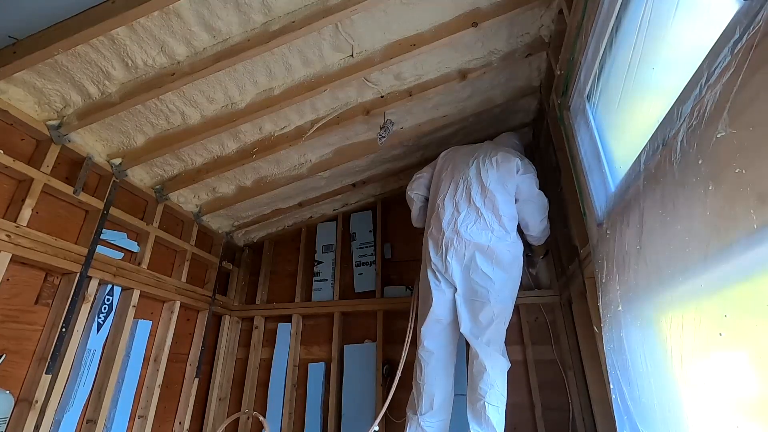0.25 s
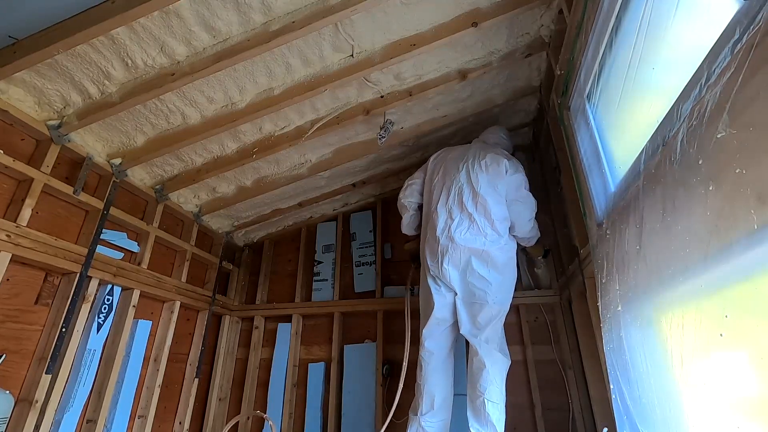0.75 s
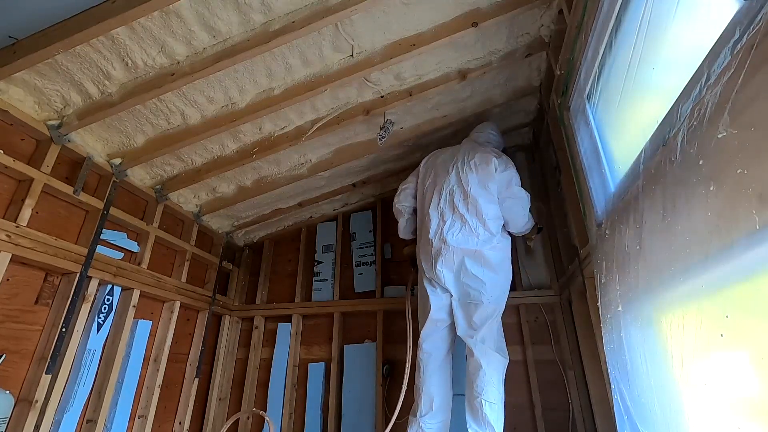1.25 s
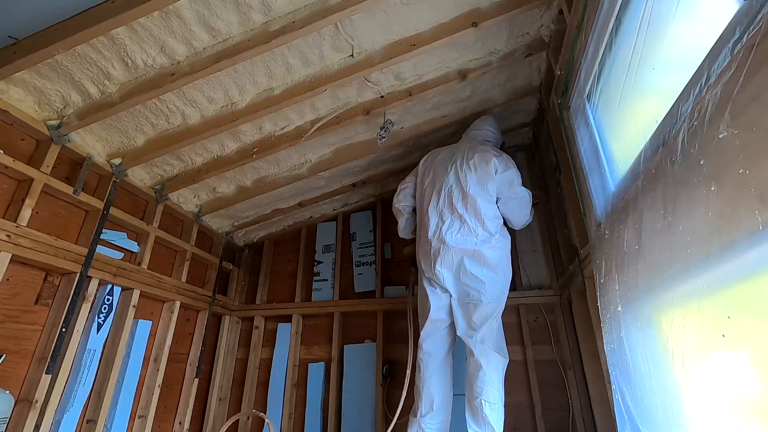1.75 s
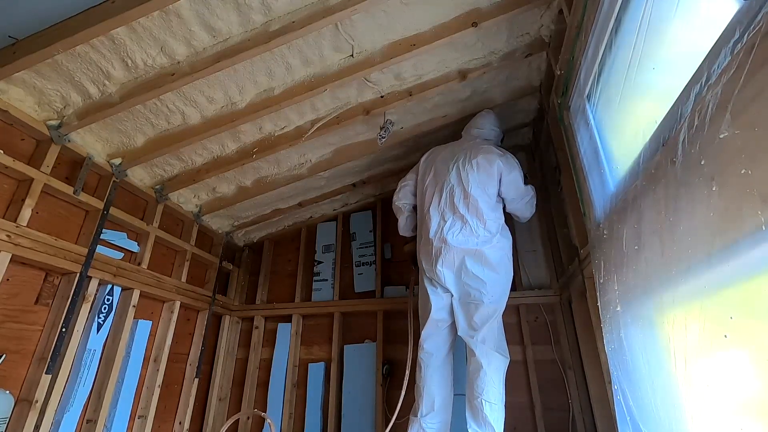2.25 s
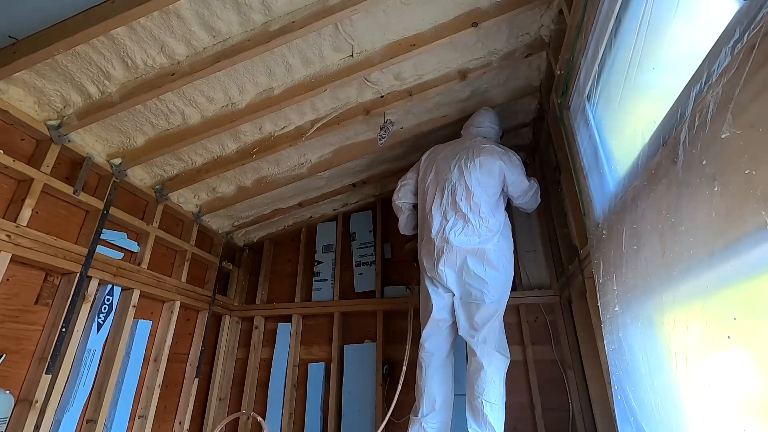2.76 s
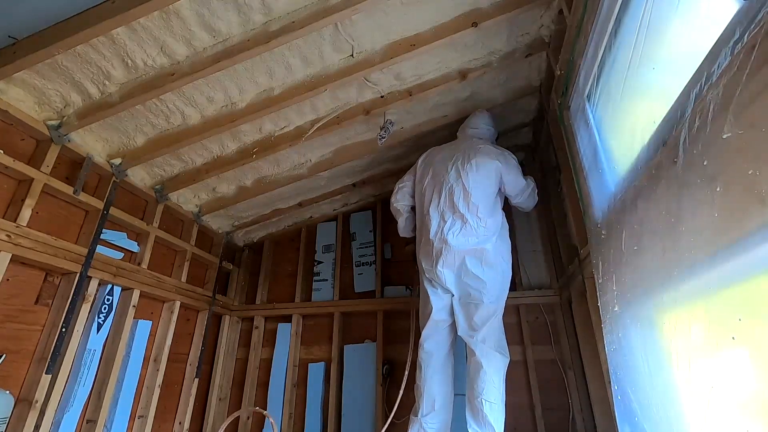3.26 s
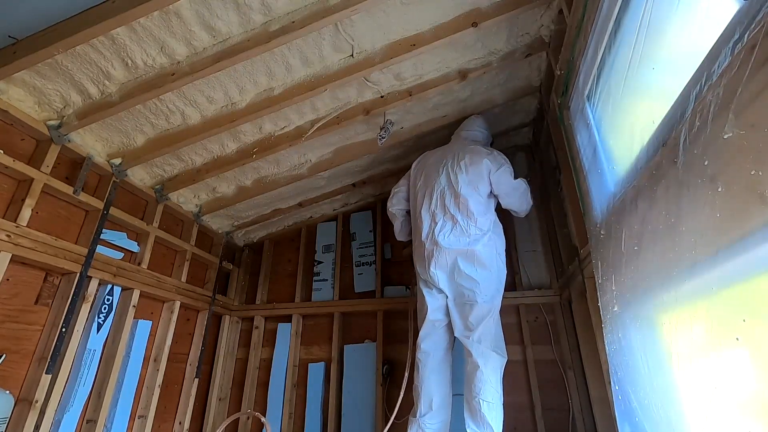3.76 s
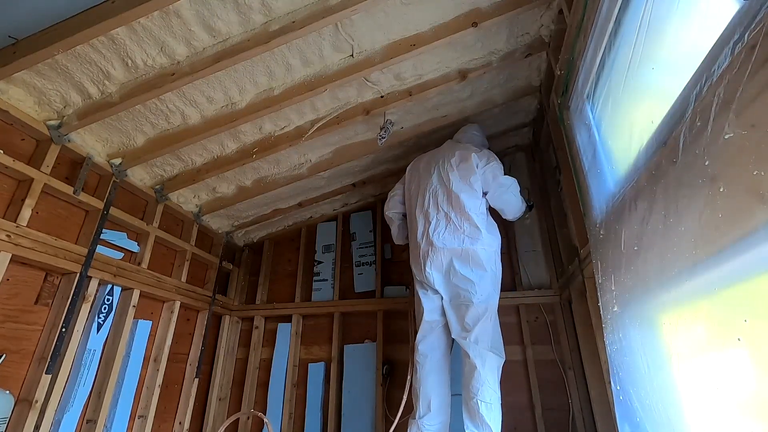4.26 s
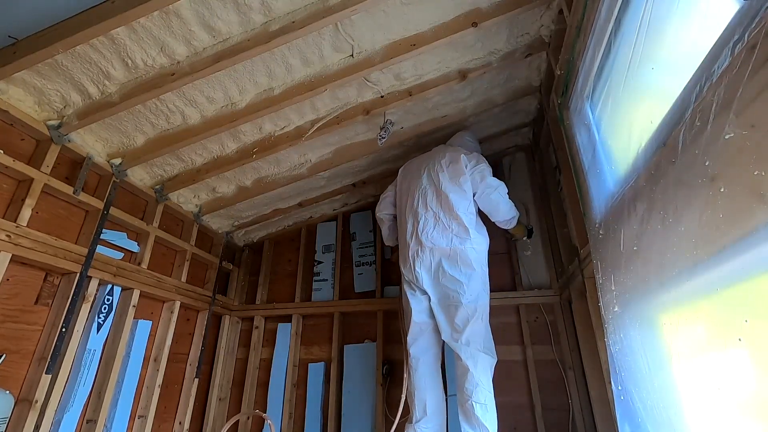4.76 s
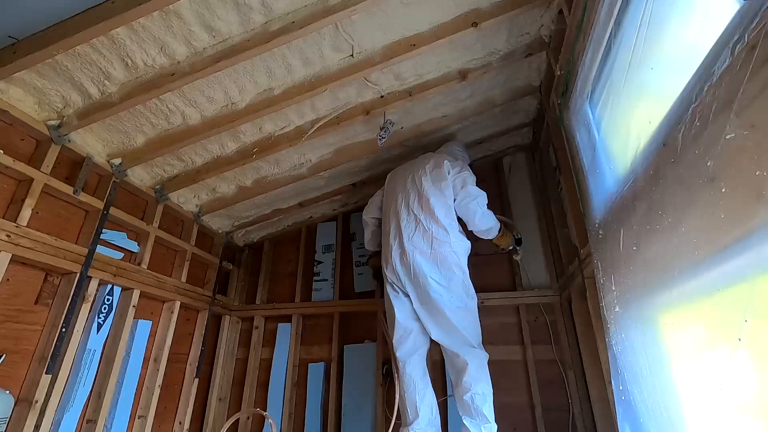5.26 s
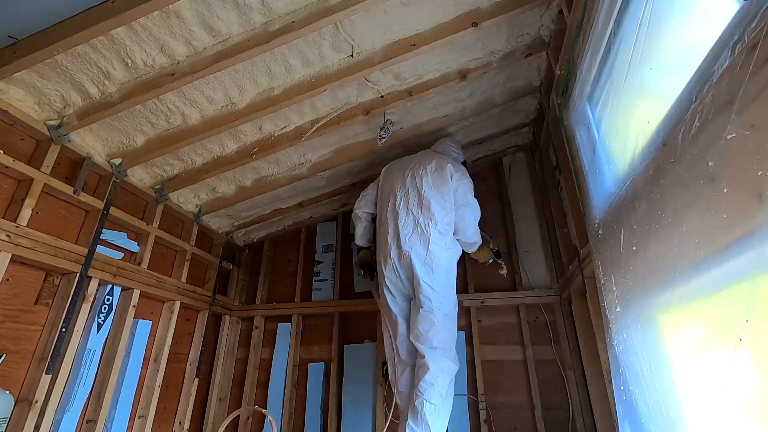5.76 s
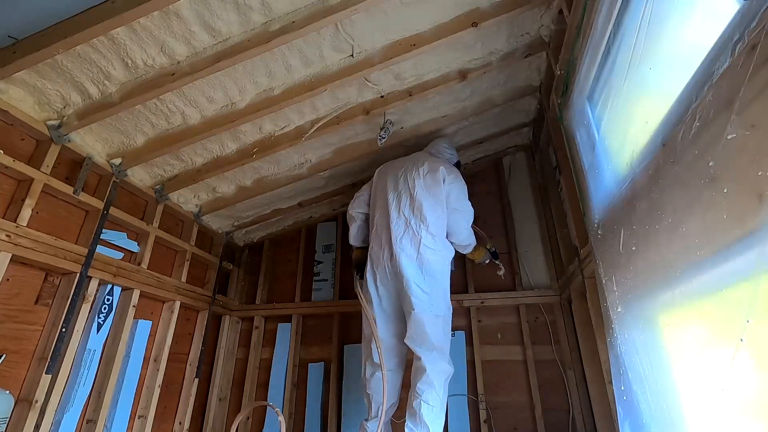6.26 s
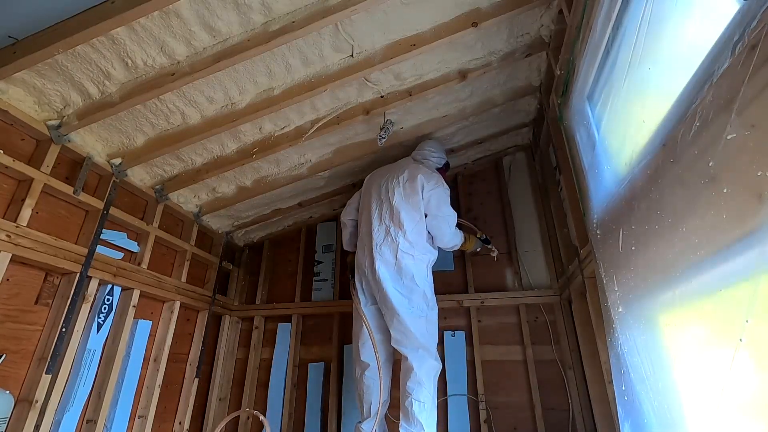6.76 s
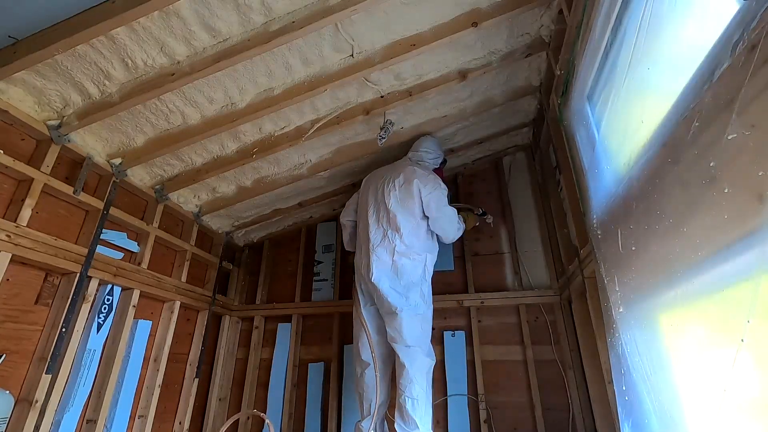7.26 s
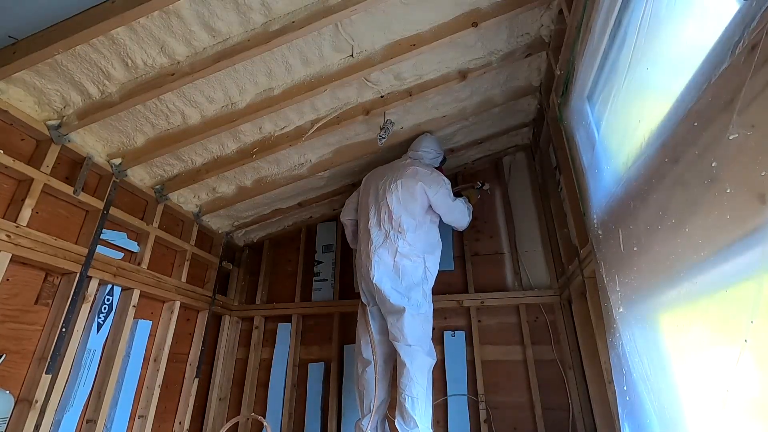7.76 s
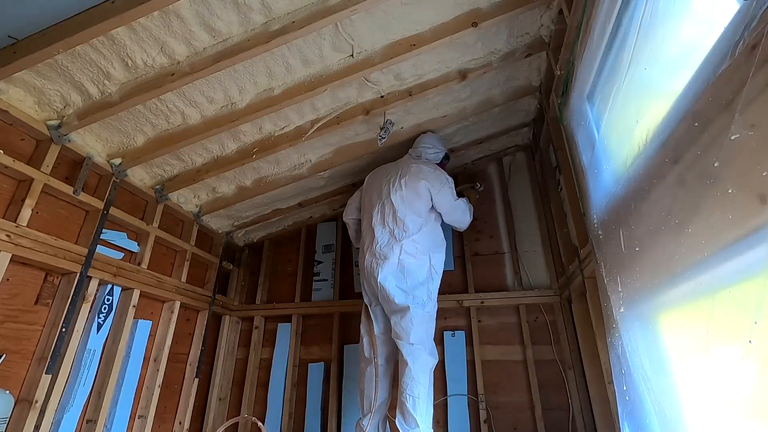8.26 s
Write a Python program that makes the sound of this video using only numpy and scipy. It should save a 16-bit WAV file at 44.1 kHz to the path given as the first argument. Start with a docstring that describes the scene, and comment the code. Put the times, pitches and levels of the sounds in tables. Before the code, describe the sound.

Rushing hiss of insulation foam being sprayed stops and restarts, broken by brief wooden knocks, rustling and a low rumble.

```python
"""A bare timber attic, a small camera a few metres from a foam gun; faint machinery and air from outside.
The gun's turbulent jet is already hissing into a wall bay, heard through one muffled microphone port.
From the second burst the camera fades over to its stereo pair; a few light knocks lead into the third.
In the long pause the worker shifts his feet: boards knock, the suit rustles, the camera's perch shakes.
The fourth burst follows, its hiss changing colour like the others as the nozzle passes studs and hollows."""
import sys
import numpy as np
from scipy import signal
from scipy.fft import rfft, irfft, next_fast_len
from scipy.io import wavfile
from scipy.ndimage import uniform_filter1d

SR = 44100
rng = np.random.default_rng(int(sys.argv[2]) if len(sys.argv) > 2 else 0)


def wrap_up_sound(samples):
    """Save the sound to the file named by the first command line argument, as 16-bit audio."""
    columns = np.atleast_2d(samples).T
    # keep every value between -1 and 1, then stretch to whole-number steps
    tamed = np.clip(columns, -1, 1)
    steps = np.round(tamed * 32767).astype(np.int16)
    wavfile.write(sys.argv[1], SR, steps)


N = 375732
TIME = np.arange(N) / SR
FFT_SIZE = next_fast_len(N + SR, real=True)
HZ = np.maximum(np.fft.rfftfreq(FFT_SIZE, 1 / SR), 1)


def undb(db):
    return 10 ** (np.asarray(db) / 20)


def unit(x):
    return x / np.sqrt(np.mean(x ** 2))


def over_hz(table, column=1):
    """A table column on the frequency axis, straight on log frequency."""
    table = np.array(table, float)
    return np.interp(np.log(HZ), np.log(table[:, 0]), table[:, column])


def over_time(table):
    """Columns of a curve on the time axis."""
    times, *columns = np.transpose(table)
    return [np.interp(TIME, times, column) for column in columns]


def spell(table):
    """Gains of a curve's dB columns, silent outside it."""
    return undb(over_time(table)) * ((TIME > table[0][0]) & (TIME < table[-1][0]))


def shape(x, gain):
    """Filter by a gain given on the frequency axis."""
    return irfft(rfft(x, FFT_SIZE) * gain, FFT_SIZE)[..., :N]


def butter(x, order, hz, kind="lowpass"):
    return signal.sosfilt(signal.butter(order, hz, kind, fs=SR, output="sos"), x)


def walk(rate_hz):
    """Random levels held for 1 / rate_hz and slewed twice; unit RMS."""
    hold = int(SR / rate_hz)
    steps = np.repeat(rng.standard_normal(N // hold + 1), hold)
    return unit(uniform_filter1d(uniform_filter1d(steps, hold), hold)[:N])


def site():
    """Distant machinery and outdoor air: two unrelated noises that swell slowly together."""
    # background spectrum: f/Hz, density/dB
    spectrum = [(30, 4), (60, 0.5), (110, 4.5), (250, -3.5), (450, -15), (900, -18), (1400, -20),
                (1900, -27), (2500, -28), (5000, -31), (9000, -44), (15000, -72)]
    air = [unit(shape(rng.standard_normal(N), undb(over_hz(spectrum)))) for _ in range(2)]
    return np.array(air) * undb(-45 + 2.2 * walk(3.35))


def attic(x, room_db, places, t60_s=0.3, treble_t60_s=0.15):
    """Direct sound plus echoes, and a row of unrelated echoes; a moving source meets new ones by place."""
    t = np.arange(SR // 3) / SR
    position = TIME / TIME[-1] * (places - 1)
    out = np.zeros((2, N))
    for place in range(places):
        weight = np.sqrt(np.clip(1 - abs(position - place), 0, 1))
        a, b = np.flatnonzero(weight)[[0, -1]]
        noise = rng.standard_normal((2, len(t)))
        low = uniform_filter1d(noise, size=9, axis=1)
        tail = low * undb(-60 * t / t60_s) + (noise - low) * undb(-60 * t / treble_t60_s)
        tail *= (t > .003) / np.sqrt(np.sum(tail ** 2, axis=1, keepdims=True))
        echoes = signal.fftconvolve((x * weight)[None, a:b], tail, axes=1)[:, :N - a]
        out[:, a:a + echoes.shape[1]] += echoes
    out[0] = (x + undb(room_db) * out[0]) / np.sqrt(1 + undb(2 * room_db))
    return out


def shake():
    """Floor bounce reaches each port through the camera's body, ringing its own low resonances."""
    # the perch shaking under shifting feet: t/s, left level/dB, right level/dB
    bounce = [(5.33, -62, -54), (5.38, -38, -32), (5.44, -35, -21), (5.53, -38, -27.5), (5.57, -39, -36),
              (5.71, -46, -41), (5.742, -26, -30), (5.755, -18, -16), (5.785, -22, -19), (5.815, -24, -12),
              (5.84, -25, -19), (5.87, -25, -14), (5.915, -24, -12.5), (5.94, -26, -25), (5.965, -24, -15),
              (5.99, -26, -21), (6.02, -26, -11), (6.05, -26, -14.5), (6.09, -32, -27), (6.125, -33, -17),
              (6.15, -38, -28), (6.18, -43, -40), (6.25, -43, -22.5), (6.31, -32, -29), (6.39, -33, -19.5),
              (6.5, -43, -30), (6.55, -46, -37), (6.8, -60, -46)]
    # resonances at the left port, then the right: f/Hz, width/Hz, level/dB
    port_modes = [
        [(48.5, 16, -2), (98, 63, -10.5)],
        [(58, 19, 6.5), (119, 47, -17)],
    ]
    out = []
    for level, modes in zip(spell(bounce), port_modes):
        resonance = sum(undb(db) / (1 + ((HZ - hz) / (width / 2)) ** 2) for hz, width, db in modes)
        sway = unit(shape(rng.standard_normal(N), resonance))
        swell = np.sqrt(uniform_filter1d(uniform_filter1d(sway ** 2, size=700), size=700) + .02)
        # the low rumble is held nearly steady, so its swells follow the footfall curve
        out.append(level * unit(sway / swell ** 0.73))
    return np.array(out)


def rustle():
    """The paper-like suit creases in dense small crackles as the worker moves."""
    # two spells of movement, each a curve: t/s, level/dB
    movements = [
        [(3.1, -82), (3.17, -56), (3.28, -58), (3.33, -80)],
        [(5.3, -44), (5.37, -28.5), (5.42, -31.5), (5.5, -50.5), (5.68, -44), (5.76, -40.5), (5.91, -39.5),
         (5.96, -32), (6.04, -43), (6.14, -47.5), (6.2, -47), (6.3, -68)],
    ]
    # spectrum of the creasing suit: f/Hz, density/dB
    spectrum = [(300, 4.5), (1200, -6), (2500, -3.5), (4500, -8.5), (8000, -19), (14000, -38)]
    crackle = rng.standard_normal(N) * undb(0.97 * rng.exponential(size=N) + 2 * walk(40))
    level = sum(spell(movement)[0] for movement in movements)
    return level * unit(shape(crackle, undb(over_hz(spectrum))))


def knocks(main_ring_hz=1180, crossover_hz=420):
    """Each knock is a short rattle of contacts: a dry crack, and a board's modes struck at a new spot."""
    # boards and gear: t/s, ring peak/dB, thud re ring/dB, rattle decay/s, crack re ring/dB, main ring f/Hz
    hits = [(2.959, -51.5, 16.5, 0.0045, -12, 1180), (3.077, -35, 0, .002, -20, 1050),
            (3.123, -51, 12, 0.0075, -12, 1180), (3.275, -39, -6, .004, -14, 1100),
            (3.339, -40, 9, 0.002, -3, 1300), (3.431, -29, -20, .014, -16, 1100),
            (5.33, -32, -10, .004, -12, 1050), (5.342, -23, -20, .005, -10, 1100),
            (5.355, -7, -28, .004, -14, 1190), (5.364, -21, 3, .008, 6, 1300),
            (5.373, -12, -4, 0.002, -6, 1400), (5.39, -19, 3, 0.008, 0, 1250),
            (5.42, -23, -3, 0.01, -3, 1400), (5.745, -38, 17, 0.025, -11, 1200),
            (5.848, -22, -3, 0.011, -13, 1080), (5.931, -21, -3, 0.006, -14, 1000),
            (5.943, -16, -3, 0.008, -6, 1330), (5.976, -24, 3, .012, -6, 950),
            (6.073, -40, 3, 0.015, 6, 1300)]
    # modes of a floorboard: f/Hz, level/dB, t60/s
    board_modes = [(110, -6, .12), (180, 0, .11), (270, -6, .08), (360, -9, .06), (700, -15, .015),
                   (1000, -5, .02), (1180, 0, .028), (1330, -4, .02), (1510, -8, .02), (2030, -9, .015),
                   (2600, -11, .012)]
    out, t = np.zeros(N + SR), np.arange(SR // 3) / SR
    for start_s, peak_db, thud_db, rattle_s, crack_db, ring_hz in hits:
        rattle = rng.standard_normal(len(t)) * np.exp(-t / rattle_s)
        onset = np.sqrt(1 - np.exp(-t / .0012))
        push = butter(rattle * onset, 3, 8000)  # boots and hose meet the boards softly
        response = np.zeros((2, len(t)))
        for hz, db, t60_s in board_modes:
            is_thud = hz < 500  # only the higher modes shift with the struck spot
            mode_hz = hz * (1 if is_thud else ring_hz / main_ring_hz) * (1 + 0.015 * rng.standard_normal())
            response[int(is_thud)] += undb(db - 60 * t / t60_s) * np.sin(2 * np.pi * mode_hz * t)
        ring, thud = signal.fftconvolve(response, push[None], axes=1)[:, :len(t)]
        crack = butter(push, 2, (1500, 3600), "bandpass")
        parts = np.array([butter(ring, 2, crossover_hz, "highpass"), butter(thud, 2, crossover_hz), crack])
        gains = undb(peak_db + np.array([0, thud_db, crack_db])) / abs(parts).max(axis=1)
        start = int(start_s * SR)
        out[start:start + len(t)] += gains @ parts
    return out[:N]


def bay(x, echo_count=6, echo_db=-13):
    """Studs, sheathing and the worker's body send back close echoes whose delays slide with the nozzle."""
    short_waves = shape(x, 1 / (1 + (1200 / HZ) ** 4))  # narrow surfaces return only short waves
    out = x.copy()
    for delay_s in rng.uniform(0.001507, .007, echo_count):
        out += undb(echo_db) * np.interp(TIME - delay_s - 0.000599 * walk(3.5), TIME, short_waves)
    return out * np.std(x) / np.std(out)


def hollows(x, half_width_share=.033):
    """Gliding, wavering bands of the hiss swell or thin out as the nozzle passes studs and hollows."""
    # bands of the hiss: start t/s, end t/s, from f/Hz, to f/Hz, lift/dB
    bands = [(0.272, .5, 1880, 1140, 4), (.95, 1.5, 7000, 6940, 3), (.95, 2.3, 1900, 1860, 2),
             (1.45, 2.15, 5200, 3500, 6.5), (1.6, 2.9, 2300, 2500, -5), (1.6, 2.8, 1000, 1050, 3),
             (1.9, 2.7, 624, 620, 6), (2.0, 2.4, 4300, 4100, 4), (2.25, 2.6, 6000, 5500, 5),
             (2.3, 2.8, 3300, 3500, 3), (3.38, 3.955, 3940, 3640, 6), (3.85, 4.35, 5170, 3700, 6),
             (4.0, 4.5, 1850, 1870, 4), (4.3, 4.7, 4370, 4180, 4.5), (4.3, 4.9, 1370, 1350, 2),
             (4.65, 5.2, 3980, 3500, 4), (4.8, 5.25, 7200, 7150, 3.5), (6.25, 6.85, 5000, 5300, 5.5),
             (6.4, 6.6, 8750, 8750, 4), (6.5, 8.1, 1300, 1370, 5), (6.6, 6.85, 4450, 4500, 4.5),
             (6.72, 7.1, 2900, 3350, 6.5), (6.8, 7.25, 3820, 4600, 5.5), (6.9, 8.1, 2150, 2000, -4),
             (7.1, 7.3, 7850, 7900, 3.5), (7.2, 7.7, 3360, 3190, 5), (7.25, 8.0, 2850, 2570, 4.5),
             (7.5, 7.8, 5730, 5800, 4.5), (7.8, 8.3, 3460, 3200, 2.5), (8.0, 8.25, 5700, 6300, 3),
             (8.12, 8.36, 5080, 5050, 8)]
    wander = 1 + .009 * walk(9)  # the hand is never still
    flicker = undb(1.5 * walk(12))
    out = x.copy()
    for start_s, end_s, from_hz, to_hz, lift_db in bands:
        a, b = int(start_s * SR), min(int(end_s * SR), N)
        centre_hz = np.linspace(from_hz, to_hz, b - a) * wander[a:b]
        carrier = np.exp(2j * np.pi * np.cumsum(centre_hz) / SR)
        narrow = signal.butter(1, half_width_share * from_hz, fs=SR, output="sos")
        band = 2 * (signal.sosfiltfilt(narrow, x[:, a:b] / carrier) * carrier).real
        envelope = np.sqrt(np.hanning(b - a)) * np.roll(flicker, int(from_hz) * 10)[a:b]
        out[:, a:b] += band * (undb(lift_db) - 1) * envelope
    return out


def foam_gun(open_db_per_s=158, puff_rise_db_per_s=280, puff_sag_db_per_s=90, knee_s=0.072):
    """Each trigger pull gives a purge puff, then a turbulent jet that hisses and roars on the wall."""
    # trigger pulls: puff t/s, full flow t/s, let-go t/s, fall/(dB/s), puff level/dB, puff treble/dB
    bursts = [(-.3, -.1, 0.44, 278, -70, -6), (0.833, 0.99, 2.774, 188, -47.5, -20),
              (3.284, 3.498, 5.204, 200, -43.5, -19), (6.18, 6.326, 8.27, 161, -47, -17)]
    # spectrum of the jet: f/Hz, density/dB
    spectrum = [(40, -31), (90, -15.5), (200, -6.5), (400, -12), (620, -13), (850, -8.5), (1100, -3),
                (1600, -4), (2200, -0.5), (3500, -0.5), (5500, -1.5), (8000, -4.5), (11000, -15.5),
                (15500, -31.5)]
    # the open jet as the nozzle sweeps: t/s, level/dB, extra treble/dB, extra wall roar/dB
    sweep = [(0, -30, 1.5, 7), (.4, -29.5, -1, 7.5), (1.0, -34.5, 9, 9), (1.3, -30, 3, 8),
             (1.6, -29, 1.5, 3.5), (2.0, -27.5, -1, -3.5), (2.75, -28.5, 1, 3), (3.5, -31, 0.5, 4),
             (4.2, -31, 1, 4), (4.6, -28, -0.5, -1), (5.2, -28.5, 0, 4), (6.35, -32.5, 3, 6),
             (6.7, -29.5, 3, 4), (7.1, -30, 4, 7.5), (7.5, -30, 4, 3), (8.3, -30.5, 5.5, 3)]
    jet_db, aim_treble_db, roar_db = over_time(sweep)
    colour = undb(over_hz(spectrum))
    colour /= np.sqrt(np.sum(colour[(HZ > 600) & (HZ < 2400)] ** 2) / len(HZ))
    droplets = undb(1.48 * rng.exponential(size=N))  # they roughen the jet a little
    noise = shape(bay(unit(rng.standard_normal(N) * droplets)), colour)
    roar = shape(noise, 1 / (1 + (HZ / 500) ** 4))
    top = shape(noise, 1 / (1 + (10500 / HZ) ** 8))
    treble = shape(noise - top, 1 / (1 + (2400 / HZ) ** 4))
    body = noise - roar - treble - top
    roar *= undb(2.2 * walk(8.3))

    def hiss(treble_db):
        return body + undb(treble_db) * treble + undb(1.34 * np.minimum(treble_db - 2.5, 0)) * top

    def soft_ramp(seconds):
        return knee_s * np.logaddexp(0, seconds * 4 / knee_s) / 4

    out = 0
    for puff_s, full_s, end_s, fall_db_per_s, puff_db, puff_treble_db in bursts:
        opening_db = open_db_per_s * soft_ramp(full_s - TIME)
        closing_db = fall_db_per_s * soft_ramp(TIME - end_s)
        flow_loss_db = opening_db + closing_db
        treble_loss_db = np.minimum(.5 * flow_loss_db, 8)  # a weak flow is duller
        wall_roar = undb(roar_db + 0.58 * closing_db) * roar  # lingers after let-go
        jet = undb(jet_db - flow_loss_db) * (hiss(aim_treble_db - treble_loss_db) + wall_roar)
        puff_loss_db = np.maximum(puff_rise_db_per_s * (puff_s - TIME), puff_sag_db_per_s * (TIME - puff_s))
        puff = undb(puff_db - puff_loss_db) * (hiss(puff_treble_db) + roar)
        out = out + jet + puff
    return out * undb(0.6 * walk(12))


def scene():
    """Sound at the left port and at the shielded right port, which hears it later and only partly alike."""
    # right port against the left: f/Hz, level/dB, phase/rad, likeness/(0-1)
    right_port = [(60, 0, 0, .8), (150, 0, 0, .97), (300, -.5, 0, .98), (700, -.7, -.3, .85),
                  (1000, .5, -.6, .8), (1150, 5, -1.1, .75), (1400, 7.5, -1.9, .7), (1650, -1.2, -3.3, .7),
                  (2000, -1.9, -3.5, .6), (2800, -8.2, -4.3, .8), (3600, -11.2, -4.6, .9),
                  (4400, -17.7, -5.1, .3), (5400, -22, -6.7, .15), (6800, -18.5, -7, .1),
                  (8300, -31, -7, 0), (10000, -19, -7, 0), (12500, -13, -7, 0), (15000, -27, -7, 0)]
    spray = hollows(attic(foam_gun(), room_db=-4.5, places=32))
    worker = attic(knocks() + rustle(), room_db=-12, places=9)
    left, unrelated = spray + worker + site()
    shielding = undb(over_hz(right_port)) * np.exp(1j * over_hz(right_port, column=2))
    likeness = over_hz(right_port, column=3)
    right = shape(left, shielding * likeness) + shape(unrelated, shielding * np.sqrt(1 - likeness ** 2))
    return np.array([left, right]) + shake()


def record(dry, fade_start_s=0.81, fade_tau_s=1, top_band_hz=11720, cutoff_hz=15800):
    """Below the top band both channels begin on the muffled port, then fade to the pair; the top is cut."""
    # muffled port against the left: f/Hz, level/dB
    muffled_level = [(100, -6.5), (280, 5), (450, 0), (650, 4.5), (1000, 0.5), (1500, -0.5), (1750, 3),
                     (1950, 3), (2150, -2), (2400, -6), (2750, -9), (3650, -19.5), (4050, -15.5),
                     (5400, -22.5), (6300, -27), (7000, -20.5), (8300, -38), (9500, -23), (11000, -16)]
    # its phase against the left: f/Hz, phase/rad
    muffled_phase = [(1500, 0), (1900, -.9), (2200, -2.2), (2500, -4.3), (2900, -4.3), (3300, -3.5),
                     (4000, -5), (11000, -5)]
    muffled = shape(dry[0], undb(over_hz(muffled_level)) * np.exp(1j * over_hz(muffled_phase)))
    muffled_share = np.exp(-np.maximum(TIME - fade_start_s, 0) / fade_tau_s)
    below_top = 1 / (1 + np.minimum(HZ / top_band_hz, 2) ** 60)
    out = dry + muffled_share * shape(muffled - dry, below_top)
    # the left top band is lifted while the muffled port is in use
    out[0] += muffled_share * (undb(6.5) - 1) * shape(dry[0], 1 - below_top)
    return signal.sosfilt(signal.ellip(14, .2, 80, cutoff_hz, fs=SR, output="sos"), out)


dry = scene()
out = record(dry)
wrap_up_sound(out)
```